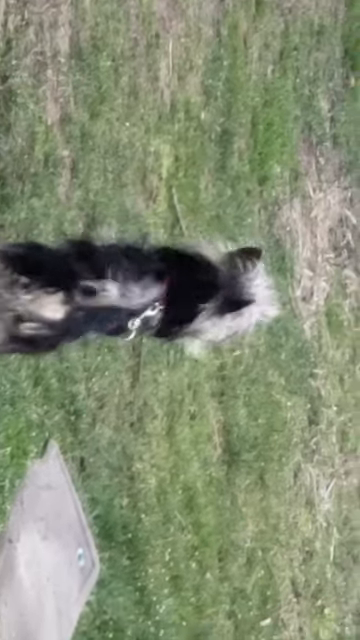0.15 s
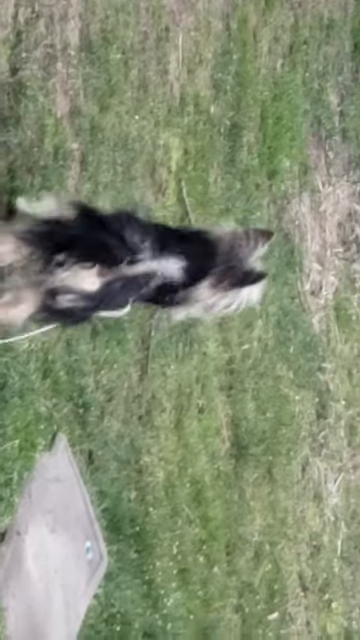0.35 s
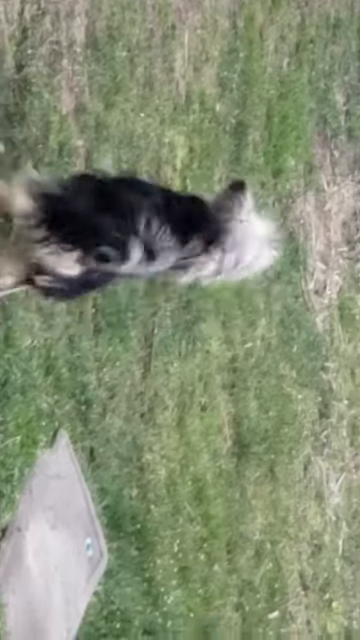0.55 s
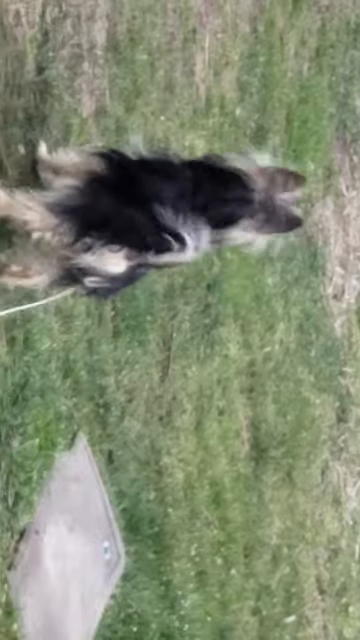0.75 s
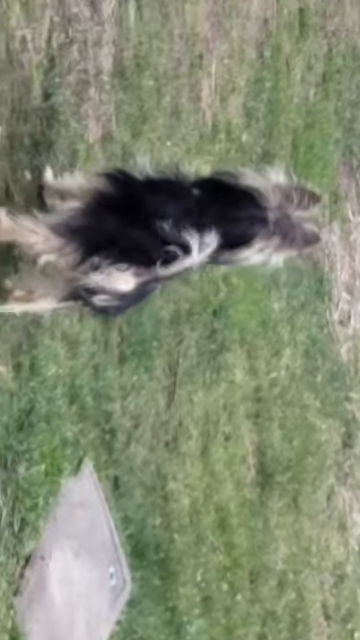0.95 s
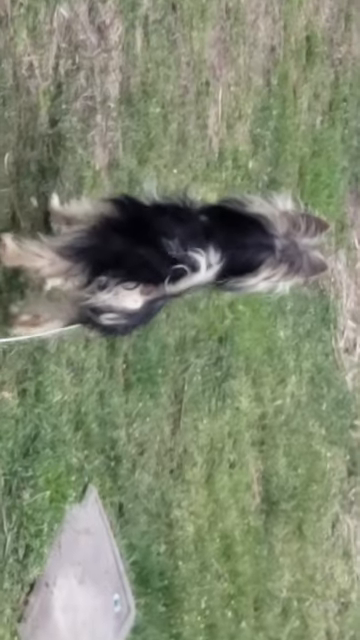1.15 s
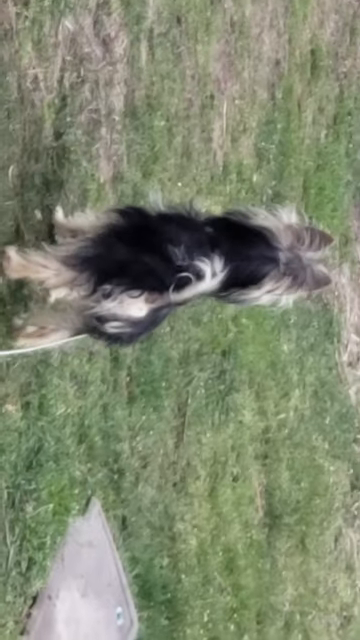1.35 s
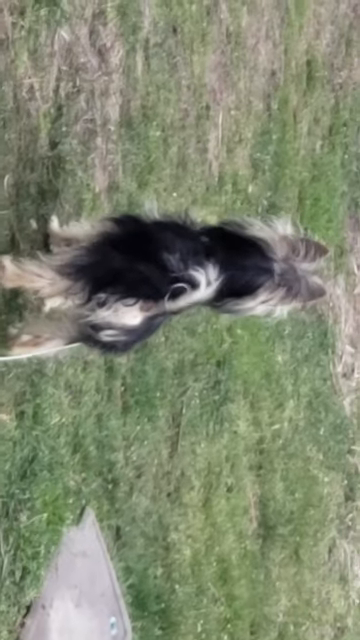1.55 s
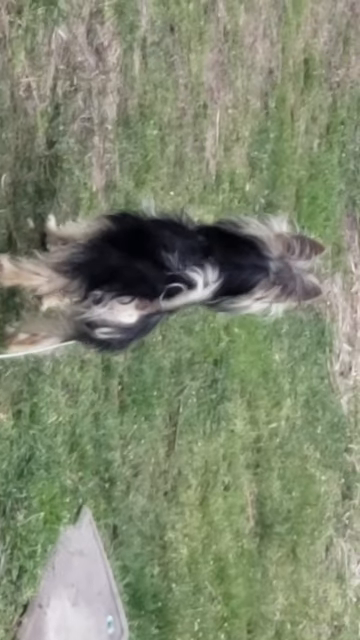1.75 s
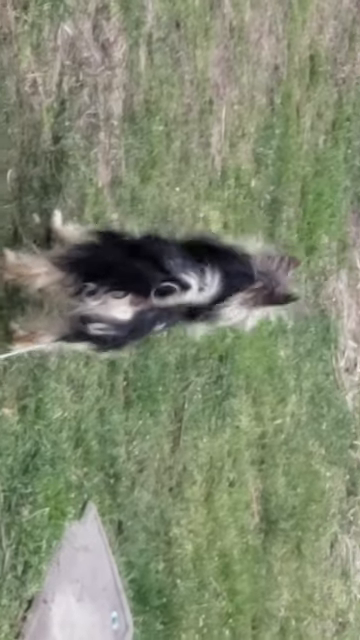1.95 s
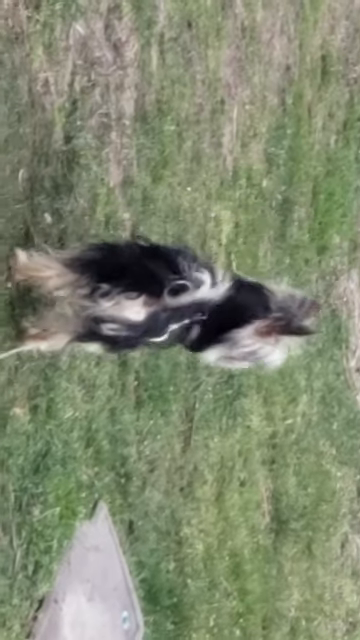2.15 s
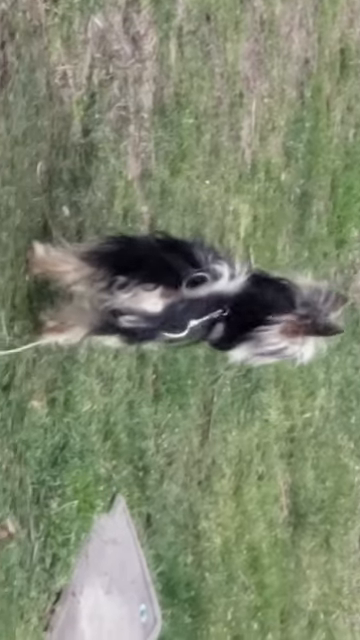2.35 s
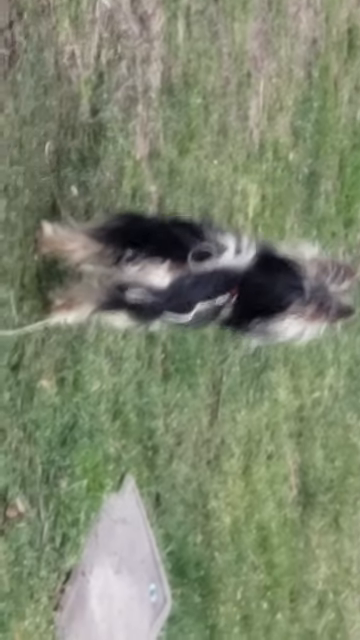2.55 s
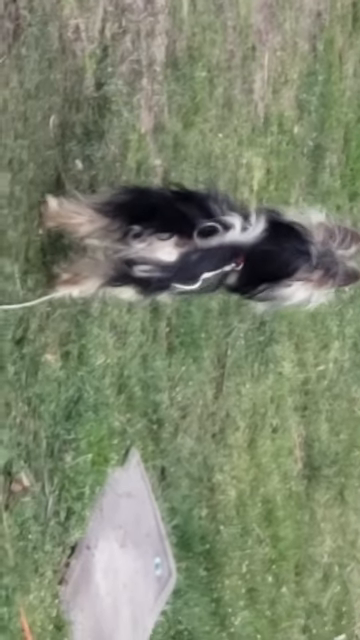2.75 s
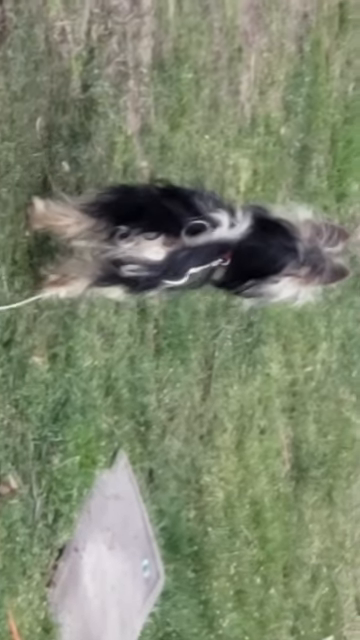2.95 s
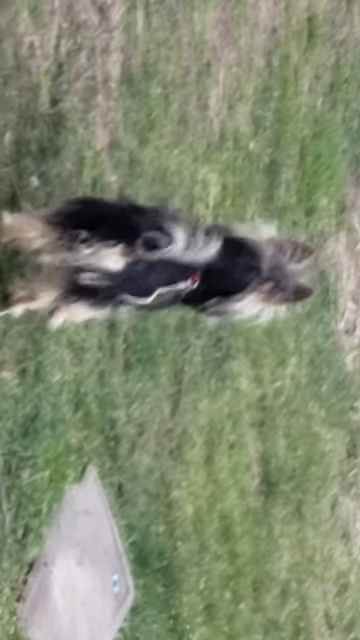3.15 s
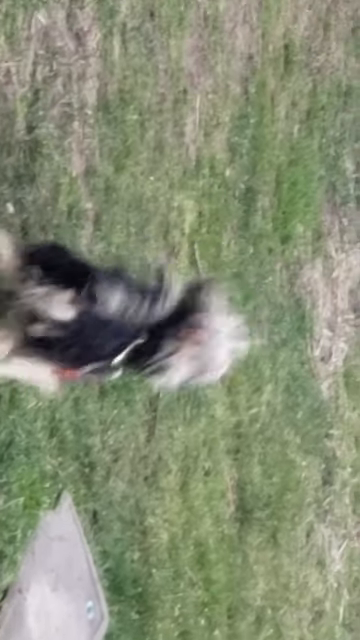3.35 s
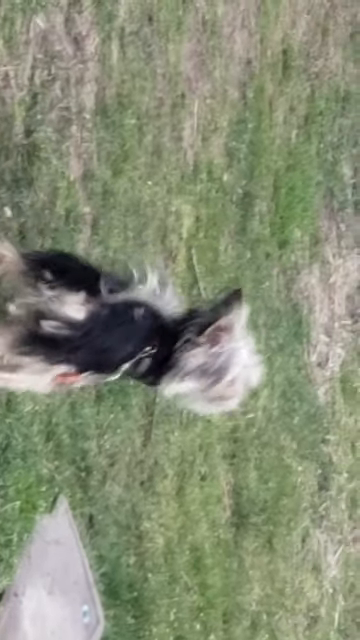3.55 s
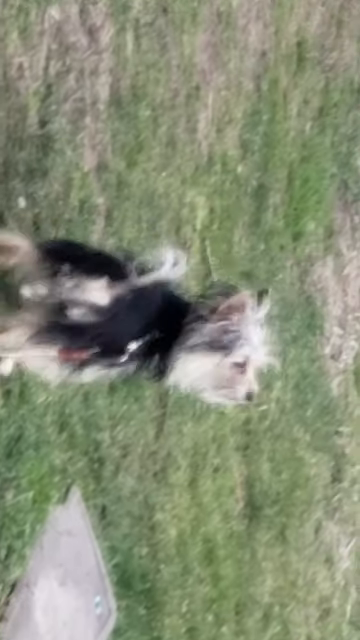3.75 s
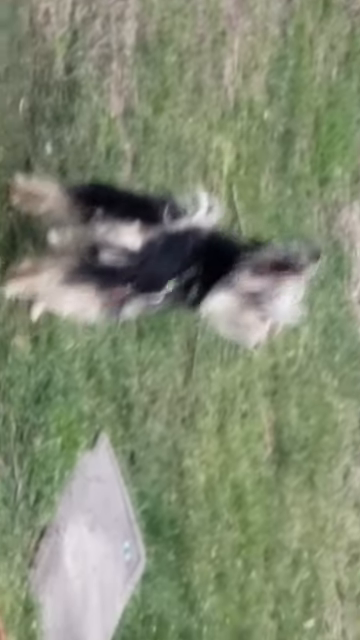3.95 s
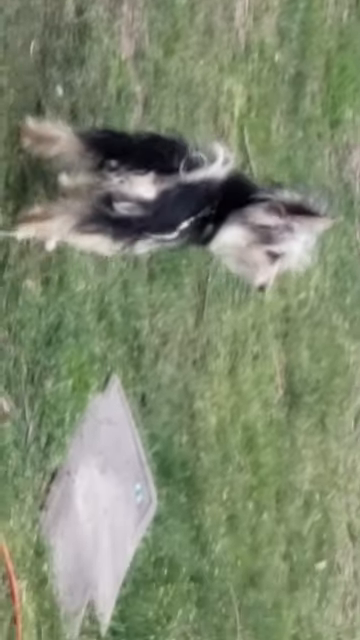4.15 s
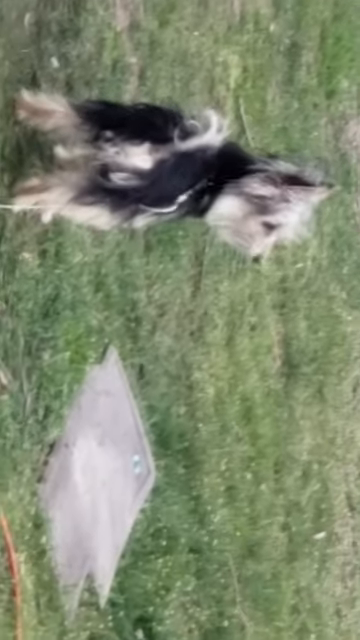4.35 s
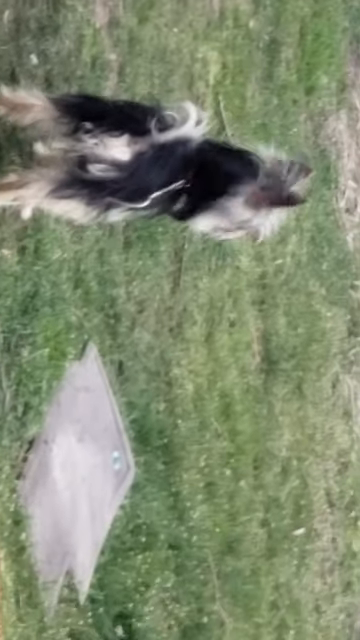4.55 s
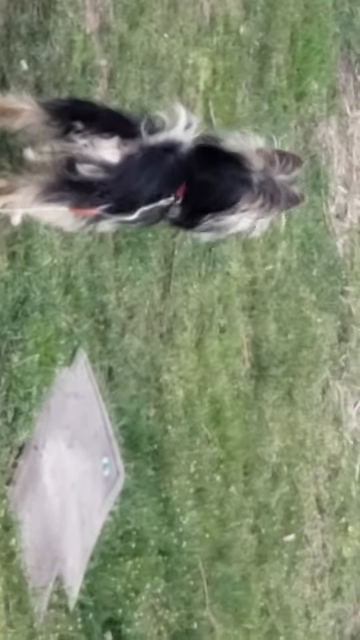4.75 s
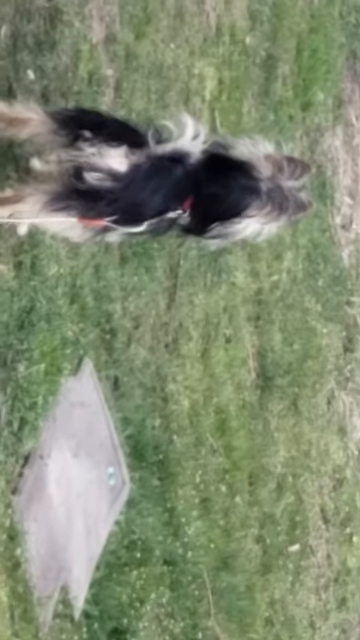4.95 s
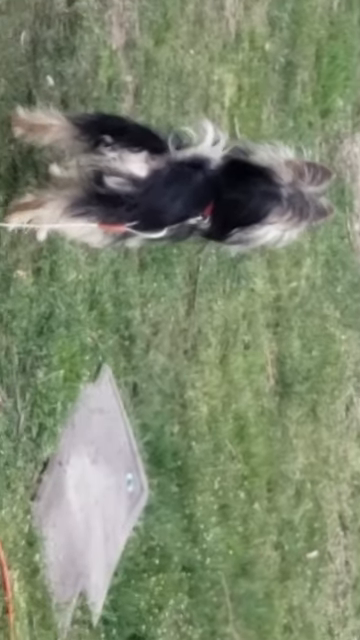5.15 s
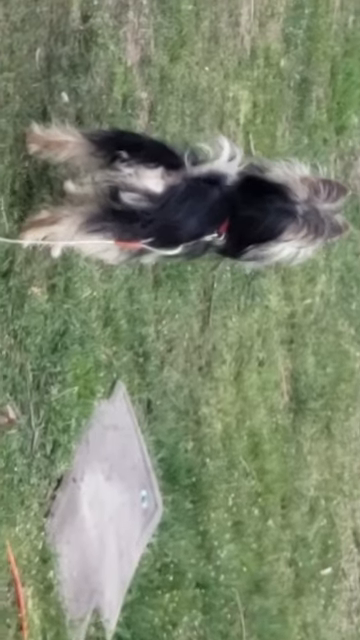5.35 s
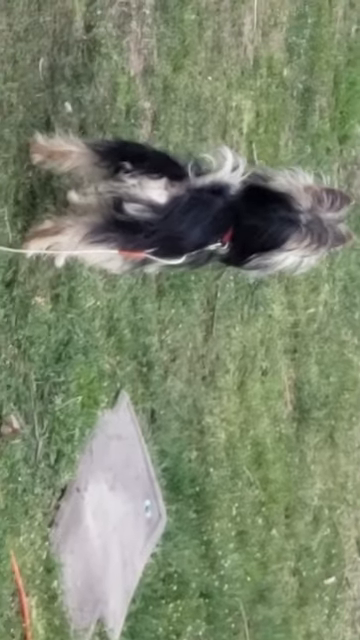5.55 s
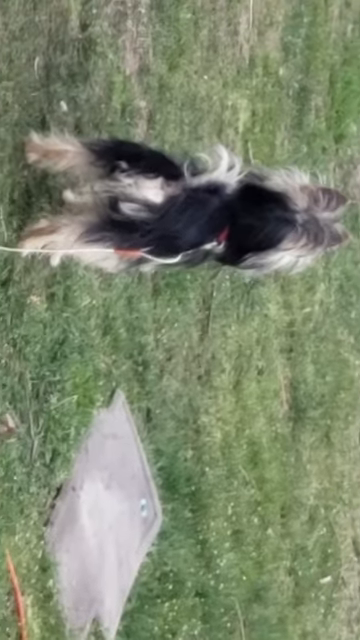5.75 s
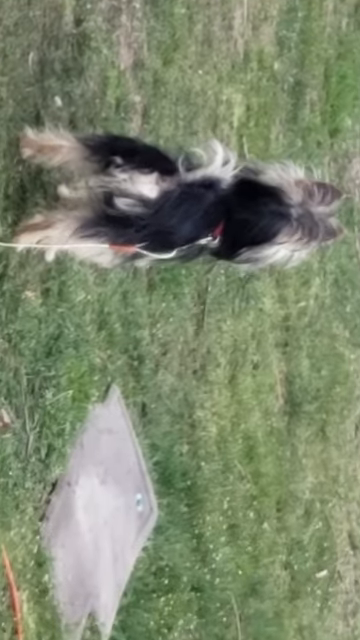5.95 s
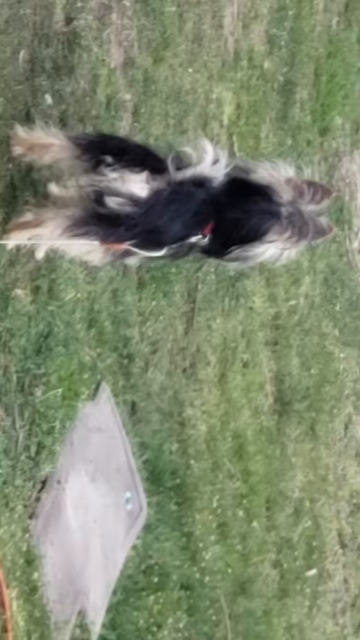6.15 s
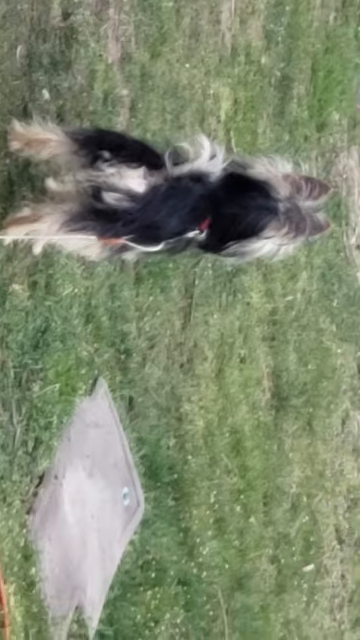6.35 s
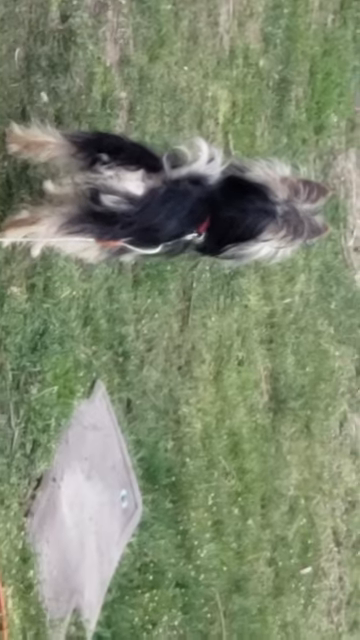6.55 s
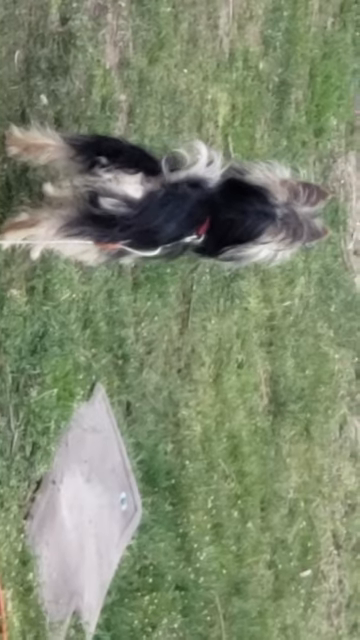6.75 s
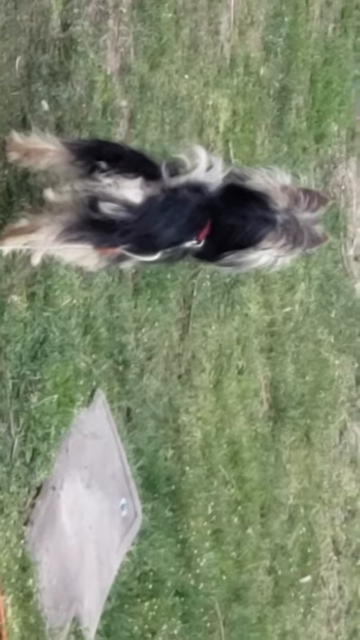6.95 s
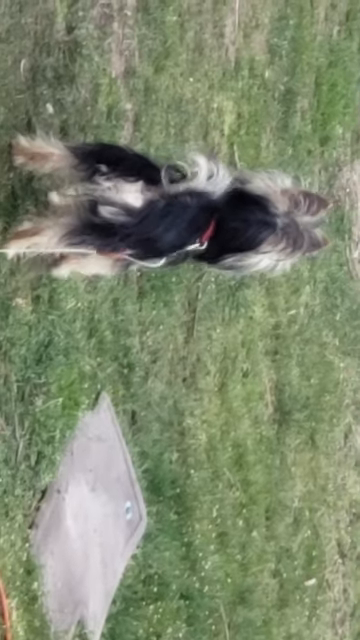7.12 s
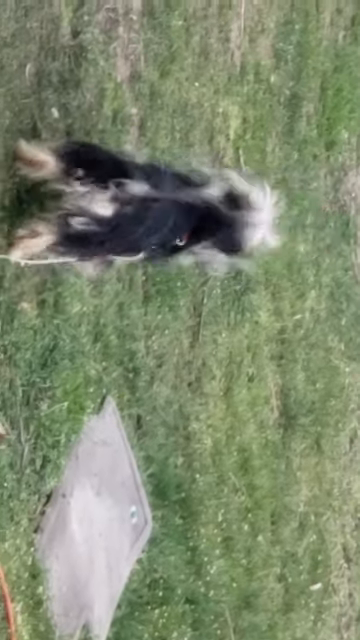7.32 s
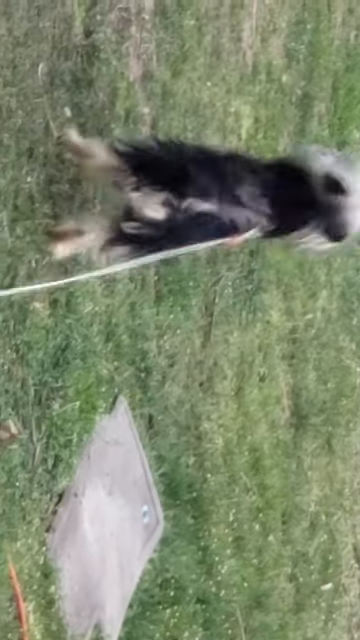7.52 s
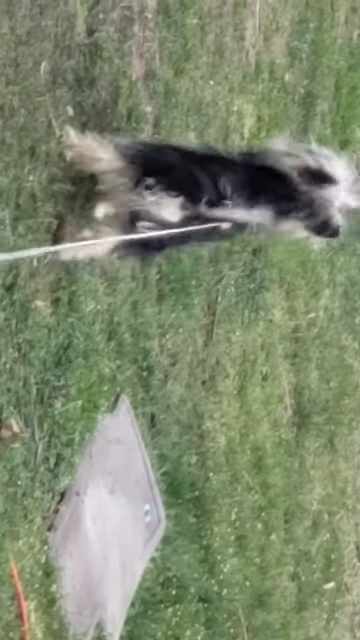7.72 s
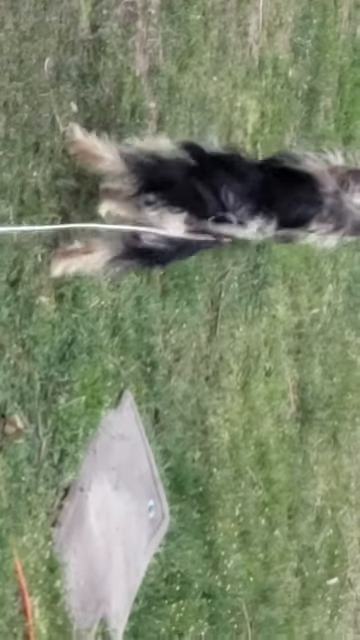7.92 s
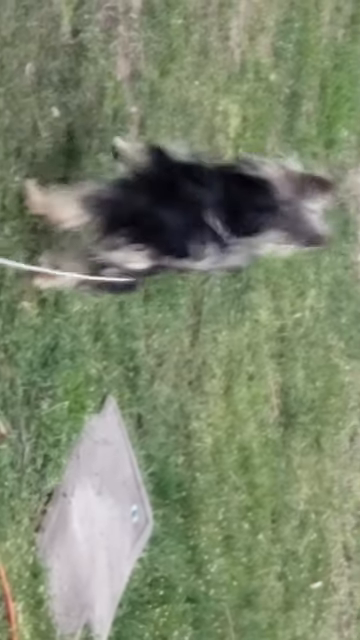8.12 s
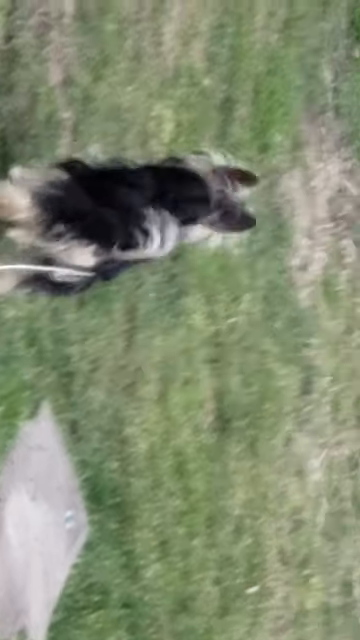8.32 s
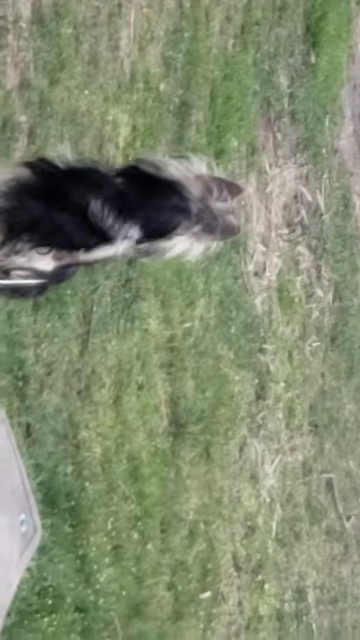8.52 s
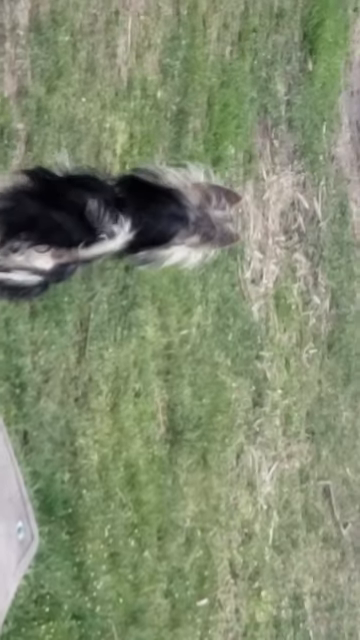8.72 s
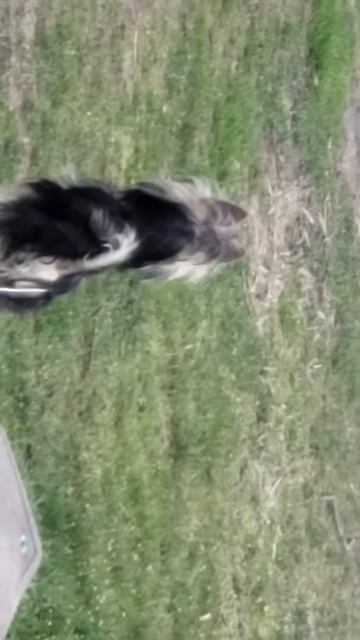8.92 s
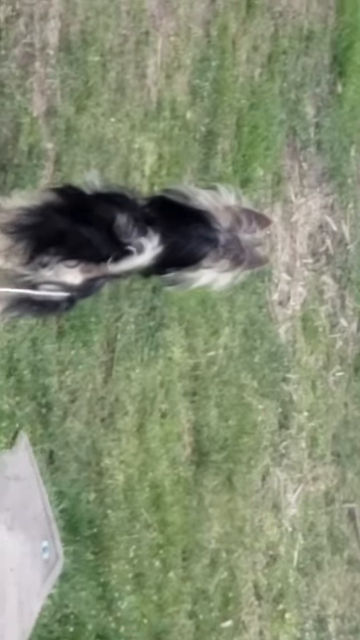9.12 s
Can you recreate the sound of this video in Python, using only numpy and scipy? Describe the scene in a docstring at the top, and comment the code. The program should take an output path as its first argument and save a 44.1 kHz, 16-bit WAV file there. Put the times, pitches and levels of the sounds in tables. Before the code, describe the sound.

Six short, hoarse, high yaps from a little dog, each leaping up in pitch and dropping away, spread unevenly with long pauses. Between them are faint whistling whines, breathy sniffs and one tiny twig snap. Gusty low wind and a barely audible far engine lie beneath; nearby walls and trees return quick faint echoes. The left microphone hears the dog weak and muffled.

```python
"""Small dog yapping on a lawn

Six yaps leap up in pitch, break into rasp and drop away: two beating voices, plus noise through resonances.
Between them come thin whines (gliding whistles), nasal hisses (swelling noise) and one snapping twig.
Walls and trees around the yard throw it back as single echoes, quick scatter and a faint tail.
A light wind (gusting low noise) rumbles over a far engine (drifting low sines).
Two microphones: the left hears the dog much more weakly than the right."""
import sys
import numpy as np
from scipy import signal
from scipy.fft import rfft, irfft
from scipy.io import wavfile

SR = 44100
rng = np.random.default_rng(int(sys.argv[2]) if len(sys.argv) > 2 else 0)


def waveform_to_disk(signal):
    """Save audio, clipped to [-1, 1], as 16-bit WAV at the path in sys.argv[1]."""
    frames = np.transpose(np.atleast_2d(signal))
    scaled = np.clip(frames, -1, 1) * 32767
    samples = np.round(scaled).astype(np.int16)
    wavfile.write(sys.argv[1], SR, samples)


N = 409248
TIME = np.arange(N) / SR

# Low rumble of the wind. Each row: time in seconds, level in dB before the lift set in wind().
WIND_LEVEL = [(0.0, -48.5), (0.1, -61.5), (0.18, -71), (0.26, -53), (0.98, -58.5), (1.11, -50.5),
              (1.44, -56.5), (3.69, -55.5), (3.98, -61), (4.27, -55.5), (5.56, -58), (6.56, -54),
              (8.32, -61), (8.48, -49), (8.86, -56), (9.07, -50.5), (9.2, -81), (9.28, -58)]
# Soft wash from the surroundings. Each row: time in seconds, level in dB before the lift set in wind().
WASH_LEVEL = [(0.0, -77), (0.8, -67.5), (1.83, -72), (3.9, -67.5), (4.86, -73), (5.74, -71.5),
              (6.46, -66.5), (7.44, -63.5), (7.81, -69), (9.28, -69.5)]
# Colour of the rumble. Each row: frequency in Hz, relative level in dB.
RUMBLE_COLOUR = [(20, -26.5), (35, -8), (50, 3), (76, 5), (100, -6.5), (130, -11), (220, -17), (400, -67.5)]
# Colour of the wash in the outdoor air. Each row: frequency in Hz, relative level in dB.
WASH_COLOUR = [(60, 1), (150, 1), (270, 1.5), (350, -4), (600, -8), (1200, -11), (2000, -22.5), (4800, -29),
               (7000, -43.5)]
# Far engine. Each row: multiple of its firing rate, mean level in dB.
ENGINE_ORDERS = [(1, -62.5), (2, -74.5), (3, -74), (3.6, -72)]
# Colour of the microphone hiss. Each row: frequency in Hz, relative level in dB.
MIC_HISS_COLOUR = [(500, -5), (2000, -0.5), (5000, -5), (8000, -14.5), (11000, -4), (13000, 0),
                   (14300, 10.5), (15000, -1), (16000, -0.5)]
# The dog in the left microphone relative to the right. Each row: frequency in Hz, level in dB.
LEFT_MIC_COLOUR = [(150, -15), (400, -12.5), (800, -15.5), (1300, -18.5), (2400, -23), (4400, -33),
                   (8000, -25), (15000, -18)]

# Echoes from ground and walls. Each row: delay in seconds, level in dB re the direct sound.
ECHOES = [(.0031, -29), (.0115, -11.5), (.0235, -24.5), (.041, -16.5), (.053, -13.5), (0.077, -23.5),
          (.115, -25.5), (0.211, -40.5)]
# Reverberation of the yard, before stretching. Each row: frequency in Hz, time to fall by 60 dB in seconds.
YARD_DECAY = [(300, .7), (1000, 0.66), (2000, 0.7), (4500, 0.75), (8000, 0.21), (14000, 0.12)]

# A twig snaps in the grass. Each row: time in seconds, level in dB.
TWIG_SNAPS = [(6.796, -43)]
# Colour of the snap. Each row: frequency in Hz, level in dB.
SNAP_COLOUR = [(500, 0), (2000, 0), (4500, -1), (7000, -20), (14000, -17)]
# Hisses through the nose. Each row: start in seconds, peak level in dB, length in seconds.
SNIFFS = [(0.327, -73.5, 0.25), (1.03, -73, 0.28), (1.969, -64.5, 0.11), (2.044, -63.5, 0.16),
          (2.376, -64.5, 0.11), (2.576, -69, 0.25), (3.756, -66, 0.092), (3.89, -66, 0.39),
          (5.297, -65, 0.2), (5.851, -59.5, 0.26), (6.361, -64, 0.29), (6.691, -58, 0.27),
          (6.818, -69, 0.35), (8.014, -69, 0.26), (8.485, -65, 0.2)]
# Colour of the nose. Each row: frequency in Hz, relative level in dB.
NOSE_COLOUR = [(1500, -29), (2700, -13), (3800, 1.5), (4650, 7), (5300, -5.5), (6000, -16.5), (7000, -35),
               (12000, -37)]
# Whines, gliding whistles. Each row: start in seconds, length in seconds, place of the turning point 0-1,
# pitch in Hz at start, turning point and end, level in dB, level change in dB from start to end.
WHINES = [(0.717, 0.33, 0.57, 2540, 2960, 3040, -51.5, -15.5),
          (2.086, 0.056, 0.3, 4700, 5300, 4800, -72, -5), (2.37, 0.059, 0.63, 3940, 4200, 3300, -71, 7),
          (2.598, 0.048, 0, 3150, 3300, 2800, -73.5, 5), (3.778, 0.035, 0.23, 4560, 4800, 3300, -62, 29),
          (3.838, .13, 0.5, 3100, 3130, 3000, -73.5, 0), (3.972, 0.075, .9, 2060, 2350, 2400, -66.5, -6),
          (4.092, 0.22, .24, 3370, 3840, 2250, -53.5, -1), (4.508, .07, 0.43, 2148, 2080, 2100, -77.5, 0),
          (5.439, 0.039, 0.13, 4900, 4670, 2950, -59, 0.5), (5.94, 0.063, 0, 4710, 4100, 2500, -65.5, 11.5),
          (5.981, 0.054, 0.48, 3024, 5200, 2270, -55.5, 6), (6.465, 0.094, 0.24, 3790, 3600, 3900, -71, -9),
          (7.011, .185, 0.5, 3490, 3940, 2000, -54.5, -3),
          (8.099, 0.15, 0.68, 2370, 2490, 2100, -64.5, 6.5),
          (8.77, 0.064, 0.14, 3060, 3100, 2600, -75, 5.5), (8.848, .11, .55, 3970, 2620, 2200, -69.5, -14)]

# Yaps, from low register through break and crest to the dropping release. Each row: start in seconds;
# break, crest and release in seconds after it; pitch in Hz at onset, break, crest and release;
# tone in dB at onset, break, crest, release and drop; lingering low register in dB, rasp in dB, hiss in dB,
# jaw opening 0-1, overtones in dB re the tone.
BARKS = [(0.0, .047, .068, .112, 1041, 1485, 1495, 1310, -28, -38.5, -31, -27.5, -39.5, -32.5, -24.5, -44.5, .05, -25.5),
         (0.597, .025, .065, .113, 809.7, 1713, 2293, 1955, -28.5, -21.5, -24.5, -26.5, -41, -27, -23, -37.5, .9, -19),
         (3.397, .036, .069, .108, 830, 1900, 2273, 1826, -27.5, -16, -24, -26.5, -48, -28.5, -22, -36.5, .95, -17),
         (7.368, .031, .064, 0.11, 815, 1888, 2274, 1830, -24.5, -16, -20, -34, -37, -28, -24.5, -37, .95, -15),
         (7.567, .015, .053, .134, 752, 1491, 1615, 1291, -39, -25, -26.5, -30, -38.5, -29, -28, -48.5, .05, -29),
         (8.212, .034, .054, .106, 830, 1816, 2188, 1821, -34, -14, -23, -25.5, -48, -43, -26.5, -41, .85, -18)]
# Throat and muzzle resonances, jaw wide open or half shut.
# Each row: frequency in Hz, width in Hz, relative level in dB.
THROAT_OPEN = [(390, 200, -13), (1145, 290, 1.5), (1714, 420, 3), (2250, 43, -5), (2790, 250, -6),
               (3290, 520, -11)]
THROAT_SHUT = [(990, 290, 1), (1516, 400, -0.5), (1950, 130, -0.5), (2286, 280, -1), (2990, 350, -15.5)]
MUZZLE_OPEN = [(4526, 260, 1), (5300, 750, -7.5), (11500, 2400, -26.5)]
MUZZLE_SHUT = [(4120, 660, -2), (5130, 490, -7), (6850, 630, -19.5), (11200, 1600, -25.5)]
# How the open mouth radiates. Each row: frequency in Hz, level in dB.
MOUTH_RADIATION = [(120, -21.5), (280, -15.5), (400, -2.5), (540, -9), (800, -2.5), (2300, 1.5), (6500, -4),
                   (8500, -15), (10500, -0.5), (15000, -7.5)]

# upper band limit of both microphones
EDGE_HZ = 15700
# the voice takes ATTACK_S to start and about LEAP_S to break upwards
ATTACK_S, LEAP_S = 0.0063, .004
# it then cracks to CRACK_DB, CRACK_SHARE of the way from break to crest, and climbs from there
CRACK_SHARE, CRACK_DB = .6, -27
# the sag after the crest is quickest at first (1 = straight)
SAG_BEND = .7
# on release the pitch collapses towards SLACK_HZ; the voice stops STOP_S later, the air sooner
SLACK_HZ, DROP_S, STOP_S, AIR_FADE_DB_PER_S = 550.2, 0.025, 0.066, 420.5
# rasp and hiss swell and fade: time of their peak as a share of the time to the crest, and sharpness
RASP_PEAK, RASP_SHARP, HISS_PEAK, HISS_SHARP = .66, 2.8, 1.1, 2.3
# with the jaw half shut the tone rings out as it passes a throat resonance
RING_HZ, RING_WIDTH_HZ, RING_DB = 1444, 75, 12.5
# the low register settles on a pitch that rises as the jaw opens
LOW_SHUT_HZ, LOW_OPEN_HZ = 920, 1081.5
# it lingers under the high one and fades after the crest; the two beat into a sum tone (dB re the low one)
LINGER_FADE_DB_PER_S, SUM_TONE_DB = 171, -15
# the line at half the pitch (dB re the tone)
DOUBLING_DB = -22


def amp(db):
    """Decibels to gain."""
    return 10 ** (np.asarray(db) / 20)


def unit(x):
    """Scales to rms 1."""
    return x / np.sqrt(np.mean(x ** 2) + 1e-20)


def read(points, hz):
    """Reads a spectrum table on a log-frequency axis."""
    f, value = np.transpose(points)
    return np.interp(np.log(hz + 1), np.log(f + 1), value)


def coloured(x, points):
    """Filters x by a spectrum table."""
    gain = amp(read(points, np.fft.rfftfreq(len(x), 1 / SR)))
    return irfft(rfft(x) * gain, len(x))


def noise(points):
    """Noise of rms 1 with the given spectrum."""
    return unit(coloured(rng.standard_normal(N), points))


def wander(size, hz):
    """Smooth random curve of rms 1, its speeds fading out around hz."""
    f = np.fft.rfftfreq(size, 1 / SR)
    slow = np.exp(-(f / hz) ** 2) * (f > 0)
    return unit(irfft(rfft(rng.standard_normal(size)) * slow, size))


def swell(t, peak_s, sharp):
    """Rises to 1 at peak_s and fades more slowly."""
    return (t / peak_s * np.exp(1 - t / peak_s)) ** sharp


def add(mix, s, sound):
    """Mixes a sound in at time s."""
    part = mix[max(0, round(s * SR)):][:len(sound)]
    part += sound[:len(part)]


def resonate(x, hz, width):
    """A steep resonance of gain 1 that follows the curve hz: shift down, smooth, shift back up."""
    turn = np.exp(2j * np.pi * np.cumsum(hz) / SR)
    r = np.exp(-np.pi * width / SR)
    smooth = signal.lfilter([(1 - r) ** 2], [1, -2 * r, r * r], x / turn)
    return 2 * (turn * smooth).real


def ring(x, modes):
    """Passes x through a set of resonances side by side; rms 1."""
    return unit(sum(amp(db) * resonate(x, np.full(len(x), hz), width) for hz, width, db in modes))


def wind(rumble_db=4.0, wash_db=7, gust_db=3.2, gust_hz=6):
    """Low rumble in small gusts, and a soft wash from the surroundings."""
    rumble_level = np.interp(TIME, *np.transpose(WIND_LEVEL)) + rumble_db + gust_db * wander(N, gust_hz)
    wash_level = np.interp(TIME, *np.transpose(WASH_LEVEL)) + wash_db
    return amp(rumble_level) * noise(RUMBLE_COLOUR) + amp(wash_level) * noise(WASH_COLOUR)


def drone(hz=77, drift=0.034, swell_db=3):
    """Low orders of a far engine, drifting in speed and fading in and out."""
    phase = 2 * np.pi * np.cumsum(hz * (1 + drift * wander(N, 2.2))) / SR
    return sum(amp(db + swell_db * wander(N, 1.2)) * np.sin(k * phase) for k, db in ENGINE_ORDERS)


def tail(stretch, start_s):
    """Sparse reflections of energy 1, each band dying at its own speed."""
    taps = rng.standard_normal(SR) * (rng.random(SR) < 3000 / SR)  # about 3000 a second
    hz, t, bands = signal.stft(taps, SR, nperseg=256)
    decay = amp(-60 * t / (stretch * read(YARD_DECAY, hz)[:, None]))
    reflections = signal.istft(bands * decay, SR, nperseg=256)[1][:SR]
    reflections *= 1 - np.exp(-(TIME[:SR] / start_s) ** 2)
    return reflections / np.linalg.norm(reflections)


def yard(x, near_db=-13, far_db=-22):
    """Direct sound, single echoes, quick scatter from things nearby and a long faint tail."""
    response = amp(near_db) * tail(0.18, 0.0034) + amp(far_db) * tail(1.3, 0.028)
    response[0] += 1
    for delay, db in ECHOES:
        response[round(delay * SR)] += amp(db)
    return signal.fftconvolve(x, response)[:N]


def snap(db):
    """A twig's tiny dry crack: a noise burst that dies within milliseconds."""
    burst = rng.standard_normal(SR // 20) * np.exp(-TIME[:SR // 20] / .0015)
    return amp(db) * coloured(burst, SNAP_COLOUR)


def sniffs(flicker_db=2.0, whistle_db=-5, whistle_hz=4650, whistle_width=450):
    """Air that does not quite whistle hisses through the dog's nose, swelling quickly and fading."""
    flow = np.zeros(N)
    for s, db, length in SNIFFS:
        add(flow, s, amp(db) * swell(TIME[:SR], .34 * length, 2.5))
    drift = 1 + .025 * wander(N, 40)
    whistle = unit(resonate(rng.standard_normal(N), whistle_hz * drift, whistle_width))
    breath = unit(noise(NOSE_COLOUR) + amp(whistle_db) * whistle)
    return flow * breath * amp(flicker_db * wander(N, 60))


def whine(length, turn, start_hz, turn_hz, end_hz, db, change_db,
          end_bend=1.4, waver=0.0099, octave_db=-42, flutter_db=2.1, soft_ends=.45):
    """A thin, unsteady whistle whose pitch curves to its turning point, then glides to its end and flattens."""
    u = np.arange(0, length, 1 / SR) / length
    turn = np.clip(turn, .01, .99)
    before = np.minimum(u / turn, 1)
    after = np.maximum(u - turn, 0) / (1 - turn)
    hz = turn_hz + (start_hz - turn_hz) * (1 - before) ** 2
    hz += (end_hz - turn_hz) * np.sin(np.pi / 2 * after ** end_bend) ** 2
    phase = 2 * np.pi * np.cumsum(hz * (1 + waver * wander(len(u), 300))) / SR
    tone = np.sqrt(2) * (np.sin(phase) + amp(octave_db) * np.sin(2 * phase))
    level = amp(db + change_db * (u - .5) + flutter_db * wander(len(u), 74))
    return level * tone * signal.windows.tukey(len(u), soft_ends)


def pitch(t, low, break_s, crack_s, crest_s, release_s, break_hz, crest_hz, release_hz):
    """Follows the low register, leaps to the high one, crests, sags and collapses as tension goes."""
    sag = np.clip((t - crest_s) / (release_s - crest_s), 0, 1) ** SAG_BEND
    high = np.interp(t, [crack_s, crest_s], [break_hz, crest_hz]) + (release_hz - crest_hz) * sag
    tension = np.exp(-(np.maximum(t - release_s, 0) / DROP_S) ** 1.2)
    leap = .5 + .5 * np.tanh(2 * (t - break_s) / LEAP_S)
    return (1 - leap) * low + leap * (SLACK_HZ + (high - SLACK_HZ) * tension)


def voice(hz, low_hz, tone_gain, low_gain, rasp_gain, hiss_gain, wide, overtone_db,
          jitter=0.033, shimmer=0.55, flutter_hz=260, rattle=0.31,
          low_jitter=0.028, flare_db=14, flare_hz=4480, flare_width=170):
    """A high voiced tone with period doubling over a lower one, rattling rasp in throat, hiss in muzzle."""
    size = len(hz)
    # the more rasp, the less steadily the folds swing
    rough = rasp_gain / (np.hypot(rasp_gain, tone_gain) + 1e-12)
    phase = 2 * np.pi * np.cumsum(hz * (1 + jitter * rough * wander(size, flutter_hz))) / SR
    slaps = wander(size, flutter_hz)
    # overtones flare as they cross the first resonance of the open muzzle
    upper = amp(overtone_db) * (np.sin(2 * phase) + amp(-20.0) * np.sin(3 * phase))
    flare = wide * amp(flare_db) * resonate(upper, np.full(size, flare_hz), flare_width)
    tone = np.sin(phase) + upper + flare
    # every second cycle is weaker: lines appear at half the pitch and at three times that
    tone += amp(DOUBLING_DB) * (np.sin(phase / 2) + amp(-11) * np.sin(3 * phase / 2))
    low_phase = 2 * np.pi * np.cumsum(low_hz * (1 + low_jitter * wander(size, flutter_hz))) / SR
    low = np.sin(low_phase) + amp(SUM_TONE_DB) * np.sin(low_phase + phase)
    folds = np.sqrt(2) * (1 + shimmer * rough * slaps) * (tone_gain * tone + low_gain * low)
    puffs = rng.standard_normal(size) * np.exp(rattle * slaps)
    rasp = unit(wide * ring(puffs, THROAT_OPEN) + (1 - wide) * ring(puffs, THROAT_SHUT))
    hiss = unit(wide * ring(puffs, MUZZLE_OPEN) + (1 - wide) * ring(puffs, MUZZLE_SHUT))
    return folds + rasp_gain * rasp + hiss_gain * hiss


def bark(break_s, crest_s, release_s, onset_hz, break_hz, crest_hz, release_hz,
         onset_db, break_db, crest_db, release_db, drop_db,
         linger_db, rasp_db, hiss_db, opening, overtone_db):
    """One yap: a low onset, a break upwards, a rough crack, a crest and a falling end."""
    t = np.arange(0, release_s + STOP_S, 1 / SR)
    wide = np.clip(opening, 0, 1)
    crack_s = break_s + CRACK_SHARE * (crest_s - break_s)
    settled_hz = LOW_SHUT_HZ + wide * (LOW_OPEN_HZ - LOW_SHUT_HZ)
    low_hz = np.interp(t, [0, crack_s], [onset_hz, settled_hz])
    hz = pitch(t, low_hz, break_s, crack_s, crest_s, release_s, break_hz, crest_hz, release_hz)
    stages = [break_s - LEAP_S, break_s + LEAP_S, crack_s, crest_s, release_s, release_s + DROP_S]
    tone_db = np.interp(t, stages, [onset_db, break_db, CRACK_DB, crest_db, release_db, drop_db])
    tone_db += (1 - wide) * RING_DB / (1 + ((hz - RING_HZ) / RING_WIDTH_HZ) ** 2)
    gate = np.minimum(t / ATTACK_S, 1) ** 2 * np.minimum((t[-1] - t) / DROP_S, 1)
    linger = amp(linger_db - LINGER_FADE_DB_PER_S * np.maximum(t - crest_s, 0))
    linger *= np.clip((t - break_s) / LEAP_S, 0, 1)
    air = amp(-AIR_FADE_DB_PER_S * np.maximum(t - release_s, 0))
    rasp = amp(rasp_db) * air * swell(t, RASP_PEAK * crest_s, RASP_SHARP)
    hiss = amp(hiss_db) * air * swell(t, HISS_PEAK * crest_s, HISS_SHARP)
    return voice(hz, low_hz, amp(tone_db) * gate, linger * air * gate, rasp, hiss, wide, overtone_db)


def scene():
    """The dog in its yard; each microphone gets its own scatter, and the left one is muffled."""
    air = wind() + drone()
    nose = sniffs()
    for s, *shape in WHINES:
        add(nose, s, whine(*shape))
    for s, db in TWIG_SNAPS:
        add(nose, s, snap(db))  # the twig shares the nose's reverberation
    barks = np.zeros(N)
    for s, *shape in BARKS:
        add(barks, s, bark(*shape))
    barks = coloured(barks, MOUTH_RADIATION)
    # the whistles beam away from the microphones, so more of them comes back from the yard
    right = yard(barks, near_db=-11, far_db=-21.5) + yard(nose, near_db=-9.5, far_db=-17.5)
    left = yard(barks, near_db=-7.5, far_db=-23.0) + yard(nose, near_db=-5, far_db=-15.0)
    left = coloured(left, LEFT_MIC_COLOUR) + amp(-20.0) * air
    left += amp(-72.5) * noise(RUMBLE_COLOUR)  # a rumble of its own
    return np.array([left, right + air])


def record(dry):
    """Faint hiss in both microphones, a little extra wash in the left, and the band limit."""
    left = dry[0] + amp(-77) * noise(MIC_HISS_COLOUR) + amp(-83) * noise(WASH_COLOUR)
    right = dry[1] + amp(-83.0) * noise(MIC_HISS_COLOUR)
    edge = signal.firwin(511, EDGE_HZ, window=("kaiser", 9), fs=SR)
    return signal.oaconvolve(np.array([left, right]), edge[None], "same")


dry = scene()
out = record(dry)
waveform_to_disk(out)
```